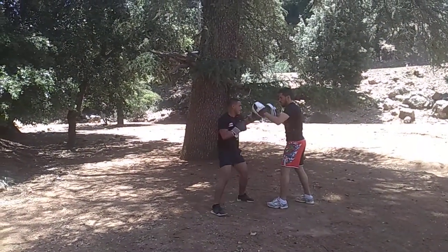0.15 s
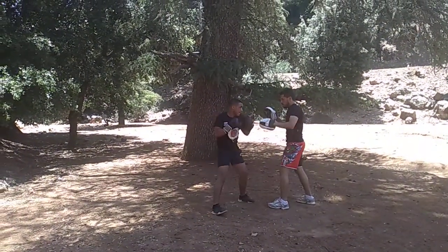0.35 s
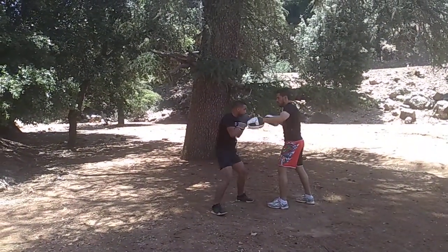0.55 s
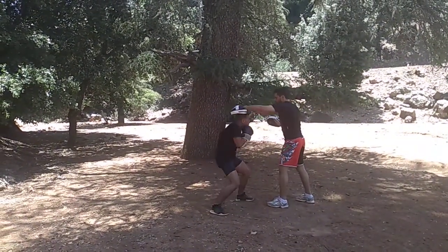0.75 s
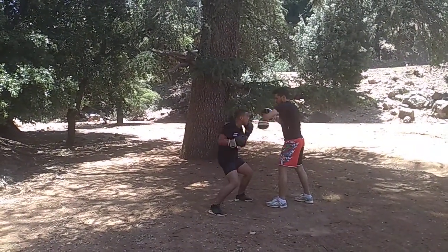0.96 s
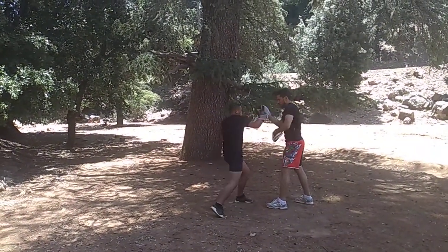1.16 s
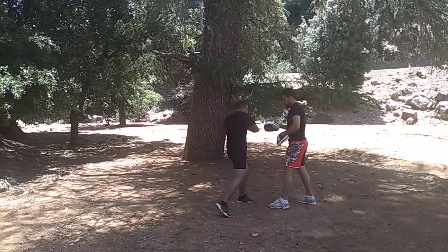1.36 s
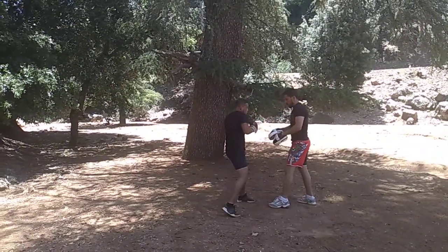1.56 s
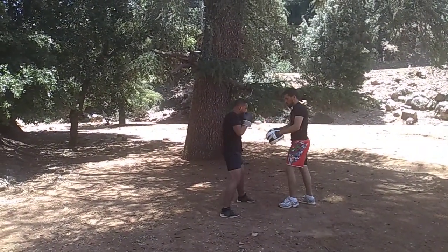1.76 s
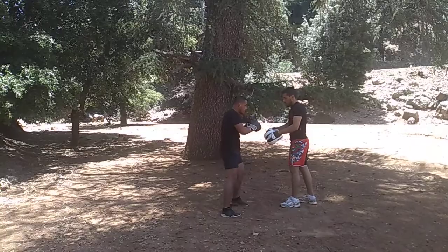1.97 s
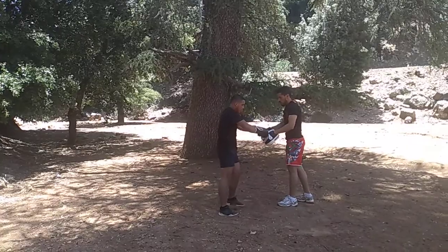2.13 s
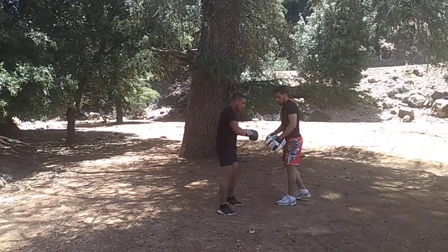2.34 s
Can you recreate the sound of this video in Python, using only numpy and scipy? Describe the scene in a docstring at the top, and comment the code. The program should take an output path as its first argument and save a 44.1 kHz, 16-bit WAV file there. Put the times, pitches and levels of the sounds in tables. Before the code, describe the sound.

A boxing glove hits a padded mitt with a sharp leather smack and thump at about 0.2 seconds, just after a shoe pivots on dry dirt. The woods echo briefly. Leather brushes faintly near 0.8 seconds, and a much softer, duller punch lands at 1.2 seconds. Light scuffs and ticks of grit continue until about 2.2 seconds. Small birds whistle faintly from 0.7 seconds over a quiet forest hush.

```python
"""Two boxing-glove punches smack a focus mitt in a forest clearing, some metres away.
Each is a leather slap, a pop of trapped air and a padded thump; a big trunk, then the woods answer.
Between the blows, shoes scuff and tick on dry dirt and leather brushes as the boxer ducks.
Small birds whistle in the trees over the faint hush of the forest."""
import sys
import numpy as np
from scipy import signal
from scipy.fft import rfft, irfft
from scipy.io import wavfile
from scipy.ndimage import uniform_filter1d, map_coordinates

SR = 44100
rng = np.random.default_rng(int(sys.argv[2]) if len(sys.argv) > 2 else 0)


def wrap_up_sound(samples):
    """Save the sound to the file named by the first command line argument, as 16-bit audio."""
    columns = np.atleast_2d(samples).T
    # keep every value between -1 and 1, then stretch to whole-number steps
    tamed = np.clip(columns, -1, 1)
    steps = np.round(tamed * 32767).astype(np.int16)
    wavfile.write(sys.argv[1], SR, steps)


N = 105840
TIME = np.arange(N) / SR


def amp(db):
    """Turn decibels into a gain."""
    return 10 ** (np.asarray(db) / 20)

def unit(x):
    """Scale to an average (rms) strength of 1."""
    return x / np.sqrt(np.mean(x ** 2) + 1e-20)

def fade(t, t60):
    """Start at t = 0 and die away, losing 60 dB in the fade time t60."""
    return (t >= 0) * amp(-60 * np.maximum(t, 0) / t60)

def along(points, hz):
    """Read a table between its listed frequencies, on a log scale."""
    f, v = np.transpose(points)
    return np.interp(np.log(hz + 1), np.log(f + 1), v)

def wobble(rate):
    """A smooth curve through `rate` random values a second."""
    return map_coordinates(rng.standard_normal(int(N * rate / SR) + 4), [TIME * rate])

def noise(tone, tilt=0):
    """Noise shaped by a tone table; tilt brightens it, in dB per octave."""
    hz = np.fft.rfftfreq(N, 1 / SR)
    gain = amp(along(tone, hz) + tilt * np.log2(hz + 1))
    return unit(irfft(rfft(rng.standard_normal(N)) * gain, N))

def burst(tone, envelope):
    """A short noise with the outline and energy of its envelope."""
    x = noise(tone) * envelope
    return x * np.linalg.norm(envelope) / (np.linalg.norm(x) + 1e-12)

def patchy(x, depth_db=4):
    """Let narrow bands of the sound swell and sink on their own."""
    bands = signal.stft(x, nperseg=1024)[2]
    swell = uniform_filter1d(rng.standard_normal(bands.shape), size=4, axis=0)
    swell = uniform_filter1d(swell, size=6, axis=1)
    return unit(signal.istft(bands * amp(depth_db * unit(swell)))[1][:N])

def scatter(x, envelope):
    """Smear a sound into many random echoes whose strength follows the envelope."""
    echoes = rng.standard_normal(N) * envelope
    return signal.fftconvolve(x, echoes / np.linalg.norm(echoes))[:N]


# Tone of the forest's hush: f/Hz, level/dB
HUSH_TONE = [(30, -19), (120, -15.5), (250, -17.5), (480, -13), (850, -3.5), (1150, -10.5), (1800, -5),
             (2400, -1), (3300, -14.5), (4000, -10), (4700, -8.5), (5700, -9), (6700, -25), (8200, -16),
             (9200, -3), (10500, -19.5), (12500, -26), (16000, -45.5)]
# Tone of a soft wash among the trees: f/Hz, level/dB
WASH_TONE = [(300, -46), (1100, -19.5), (1500, -1), (2100, 3.5), (2800, -3.5), (3700, -7.5), (5000, -21),
             (7000, -35), (16000, -68)]
# How the wash comes and goes: t/s, level/dB
WASH_LEVELS = [(0, -69.5), (0.699, -76), (.88, -63), (1.02, -66), (1.16, -87), (1.4, -62.5), (1.66, -78),
               (1.75, -72), (2.1, -67.5), (2.26, -64.5), (2.4, -67.5)]

def forest_hush():
    """A faint, gently wavering hush, with a mid-range wash that swells and sinks."""
    wash = amp(np.interp(TIME, *np.transpose(WASH_LEVELS))) * patchy(noise(WASH_TONE))
    return amp(-71.5 + 0.64 * wobble(7.1)) * patchy(noise(HUSH_TONE)) + wash


# Bird notes: t/s, length/s, first f/Hz, last f/Hz, level/dB
BIRD_NOTES = [(0.74, 0.087, 2115, 1958, -56.5), (0.765, 0.078, 6250, 6100, -58.5),
              (0.829, 0.049, 3470, 2590, -66), (1.024, 0.079, 5800, 5580, -61.5),
              (1.068, 0.099, 5580, 5560, -62.5), (1.158, 0.16, 6030, 5310, -57),
              (1.301, 0.046, 1925, 1820, -56.5), (1.355, 0.037, 3550, 2870, -61),
              (1.452, 0.081, 3440, 3640, -62), (1.586, 0.11, 5960, 5100, -54),
              (1.648, 0.097, 2340, 2150, -66), (1.715, .06, 6090, 5110, -54),
              (2.006, 0.04, 2066, 1890, -56.5), (2.189, 0.049, 2103, 2217, -54.5),
              (2.224, 0.056, 3900, 3000, -62.5), (2.232, 0.035, 1970, 1570, -60),
              (2.253, 0.067, 2910, 2670, -60.5)]

def birds(waver=.007, flutter_db=2.2):
    """Short gliding whistles, blurred by the trees."""
    song = np.zeros(N)
    for start, length, first_hz, last_hz, db in BIRD_NOTES:
        progress = np.clip((TIME - start) / length, 0, 1)
        pitch = (first_hz + (last_hz - first_hz) * progress) * (1 + waver * wobble(250))
        envelope = np.minimum(progress / 0.2, 1) * np.sqrt(1 - progress)
        whistle = np.sin(2 * np.pi * np.cumsum(pitch) / SR)
        song += amp(db + flutter_db * wobble(110)) * envelope * whistle
    return song + amp(-8) * scatter(song, fade(TIME, t60=.35))


# Tone of brushed leather: f/Hz, level/dB
BRUSH_TONE = [(100, -10), (300, -21), (500, -7), (800, -9.5), (1600, -3), (3400, -6), (4600, 1), (6000, -4),
              (7000, -5), (7800, 3), (8900, -14), (12000, -20.5), (16000, -23)]

def leather_brush(start=.805, hold_s=.06, db=-55):
    """A light, crinkly brush of leather as the boxer ducks."""
    t = TIME - start
    stroke = fade(t, t60=.45) * fade(np.maximum(t - hold_s, 0), t60=0.35)
    return amp(db) * stroke * unit(noise(BRUSH_TONE) * amp(3 * wobble(300)))


def grit():
    """Loose grit makes the level of a sliding sole flicker."""
    return unit(amp(-0.5 * wobble(950) + 1.1 * wobble(50)))

# The boxer pivots into the first punch: t/s, level/dB
PIVOT_LEVELS = [(0, -44), (.035, -47), (.048, -48), (.08, -48.5), (.1, -46), (.113, -55.5), (.17, -62),
                (.22, -61.5), (.3, -100)]
# Tone of the turning sole: f/Hz, level/dB
PIVOT_TONE = [(24, -48), (40, -22), (124, 4), (256, -6), (297, -7), (467, -7), (1180, -8), (1270, -9),
              (2440, -10.5), (3140, -16.5), (5580, -8), (7170, -16.5), (8550, -5), (10200, -20),
              (16000, -26)]
# Shoes sliding: t/s, rise/s, time until fading/s, level/dB, fade time/s, tilt/(dB per octave)
SHOE_SCUFFS = [(0.531, 0.081, 0.21, -66.5, 0.27, 2), (1.093, 0.011, 0.065, -64.5, 0.096, 4),
               (1.473, 0.046, 0.072, -58.5, 0.32, -0.5), (1.702, 0.099, .17, -56, 0.66, 1.5),
               (1.999, 0.016, 0.056, -60.5, 0.206, 0), (2.051, 0.026, 0.035, -65.5, 0.27, -2.5),
               (0.128, 0.024, 0.031, -54, 0.45, -1)]
# Tone of dry dirt: f/Hz, level/dB
DIRT_TONE = [(100, -31), (400, -12.5), (850, 8.5), (1130, -5.5), (1400, 4), (2000, 3.5), (3100, -5.5),
             (4700, 2.5), (5900, -1.5), (6800, -19.5), (9000, -15), (12000, -18), (16000, -39)]
# Grit snapping under the soles: t/s, level/dB
GRIT_SNAPS = [(0.0853, -42.5), (.099, -44.5), (1.145, -61), (1.16, -72), (1.3105, -53), (1.521, -52),
              (2.147, -54), (2.202, -65)]

def footwork():
    """Soles turn and grind over dirt in rough strokes, with single snaps of grit."""
    shoes = amp(np.interp(TIME, *np.transpose(PIVOT_LEVELS))) * noise(PIVOT_TONE) * grit()
    for start, rise, length, db, release, tilt in SHOE_SCUFFS:
        t = TIME - start
        stroke = np.clip(t / rise, 0, 1) * fade(np.maximum(t - length, 0), release)
        shoes += amp(db) * stroke * patchy(noise(DIRT_TONE, tilt)) * grit()
    snaps = np.zeros(N)
    for start, db in GRIT_SNAPS:
        t = TIME - start
        snaps += amp(db) * (fade(t, t60=0.0096) + amp(-16.5) * fade(t, t60=0.17))
    return shoes + snaps * noise(DIRT_TONE, tilt=1.5)


# How long the woods ring: f/Hz, fade time/s
WOODS_FADE = [(80, 1.4), (140, 1.05), (250, .7), (600, 0.54), (2000, 0.87), (5000, .5), (8500, 0.43),
              (15000, .31)]

def woods(tone, onset_s=0.02):
    """Near trees scatter the sound, then a longer tail keeps the bass and middle."""
    hz, t, bands = signal.stft(rng.standard_normal(N), SR, nperseg=512)
    near = amp(6) * fade(t, t60=0.26)
    far = fade(t, along(WOODS_FADE, hz)[:, None])
    tail = signal.istft(bands * np.hypot(near, far) * amp(along(tone, hz))[:, None], SR)[1][:N]
    tail *= 1 - np.exp(-np.square(TIME / onset_s))
    return tail / np.linalg.norm(tail)


TRUNK_DELAY_S = .0285

def trunk_echo(sound, spread_s=.003):
    """The rough bark returns a smeared echo."""
    return scatter(sound, np.exp(-np.abs(TIME - TRUNK_DELAY_S) / spread_s))

def trunk_thud(t, hz=210, swell_s=0.003):
    """The thump comes back from the trunk as a brief, rounded pulse."""
    t = t - TRUNK_DELAY_S
    return amp(-10.5) * np.sin(2 * np.pi * hz * t) * np.exp(-np.square(t / swell_s))


def ring(t, hz, t60):
    """A pure tone that starts at t = 0 and dies away."""
    return np.sin(2 * np.pi * hz * t) * fade(t, t60)

# The notes of the padded mitt: f/Hz, level/dB, fade time/s, delay/s
PADDING_NOTES = [(394.5, 0.5, .042, .0003), (169.5, -6.5, .06, .0006), (319, -5.5, .028, 0.00035),
                 (125, -11, .045, 0.00076), (81.07, -14, .05, .001), (580, -15.5, .025, 0.0015),
                 (810, -3.5, .02, .0008), (1007, -3, .022, .0008)]

def padding_thump(t, rise_s=.001):
    """The padding's quickly muffled notes swell as it is squeezed."""
    squeeze = 1 - np.exp(-np.maximum(t, 0) / rise_s)
    return squeeze * sum(amp(db) * ring(t - delay, hz, t60) for hz, db, t60, delay in PADDING_NOTES)


# Tone of leather slapping leather: f/Hz, level/dB
SLAP_TONE = [(200, -29), (600, -11.5), (790, 0.5), (1020, 1), (1250, -8.5), (1500, -5), (1750, -0.5),
             (1970, 1.5), (2150, -6.5), (2400, -1.5), (2780, -1.5), (3500, -16.5), (3950, -6.5),
             (4700, -14.5), (5400, -1), (6300, -5.5), (7200, -3.5), (8350, 4), (9700, -11), (10900, -11),
             (12000, -19), (16000, -20.5)]
# Tone of the glove crumpling: f/Hz, level/dB
CRUSH_TONE = [(200, -18), (700, -2), (1150, -7), (1800, 3), (3500, -8.5), (4000, 4), (4400, -6),
              (4740, 2.5), (5100, -4), (6300, -11), (7600, 2), (8700, -5), (9600, -21), (11000, -5.5),
              (12400, -11), (16000, -26)]
# Tone of the smack among the trees: f/Hz, level/dB
SMACK_ECHO_TONE = [(40, -32), (300, -6), (470, 3), (750, 0), (1150, -3.5), (1750, 1), (2350, -3),
                   (3100, -8), (4000, -4), (5500, 0), (7000, -4), (8500, 6), (10000, -1.5), (12000, -7.5),
                   (15000, -13)]
# Tone of the thump among the trees: f/Hz, level/dB
THUMP_ECHO_TONE = [(30, -28), (70, -6.5), (115, -1), (190, -3), (300, -11), (470, -2.5), (650, -13),
                   (1200, -24.5), (4000, -51)]
# The blows: t/s, slap level/dB, slap fade time/s, thump level/dB, pop f/Hz, pop level/dB,
# crush level/dB, crush length/s, trunk echo gain/dB, woods level/dB
BLOWS = [(0.2333, -11.5, 0.024, -19, 2395, -13.5, -37, 0.0064, -13.5, -2.5),
         (1.2402, -33, 0.026, -25, 4480, -33.5, -31.5, 0.012, -22.5, -14)]

def punches(pop_delay_s=0.001452, glance_s=(1.2392, 1.2412)):
    """Leather slaps, trapped air pops, the padding thumps and the glove crumples; the trees answer."""
    hits = np.zeros(N)
    for start, slap_db, slap_t60, thump_db, pop_hz, pop_db, crush_db, hold, trunk_db, woods_db in BLOWS:
        t = TIME - start
        slap = amp(slap_db) * burst(SLAP_TONE, fade(t, slap_t60))
        pop = amp(pop_db) * ring(t - pop_delay_s, pop_hz, t60=0.017)
        crush = amp(crush_db) * burst(CRUSH_TONE, (t > 0) * fade(np.maximum(t - hold, 0), t60=0.023))
        smack = slap + pop + crush
        thump = amp(thump_db) * padding_thump(t)
        echo = amp(trunk_db) * trunk_echo(smack) + amp(thump_db) * trunk_thud(t)
        tail = amp(woods_db) * woods(SMACK_ECHO_TONE) + amp(thump_db + 7) * woods(THUMP_ECHO_TONE)
        tail = np.interp(t, TIME, tail, left=0)  # move the tail to the moment of the blow
        hits += smack + thump + echo + tail
    # The second punch glances, brushing the mitt as it lands.
    brushing = (TIME > glance_s[0]) & (TIME < glance_s[1])
    return hits + amp(-37) * burst(CRUSH_TONE, brushing * 1.)


def scene():
    """All the sounds added into one channel."""
    return (punches() + footwork() + leather_brush() + birds() + forest_hush())[None]

def record(dry, low_hz=78, top_hz=15800):
    """Cut away the deep bass and the very highest treble."""
    thin = signal.sosfilt(signal.butter(3, low_hz, "high", fs=SR, output="sos"), dry)
    return signal.sosfilt(signal.ellip(10, .1, 90, top_hz, fs=SR, output="sos"), thin)


dry = scene()
out = record(dry)
wrap_up_sound(out)
```